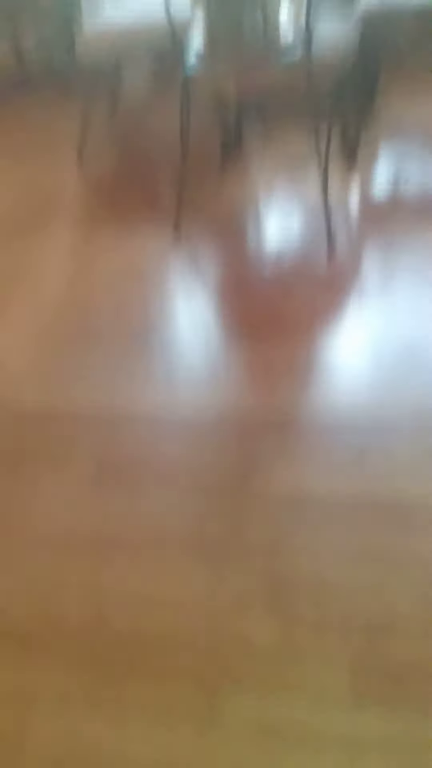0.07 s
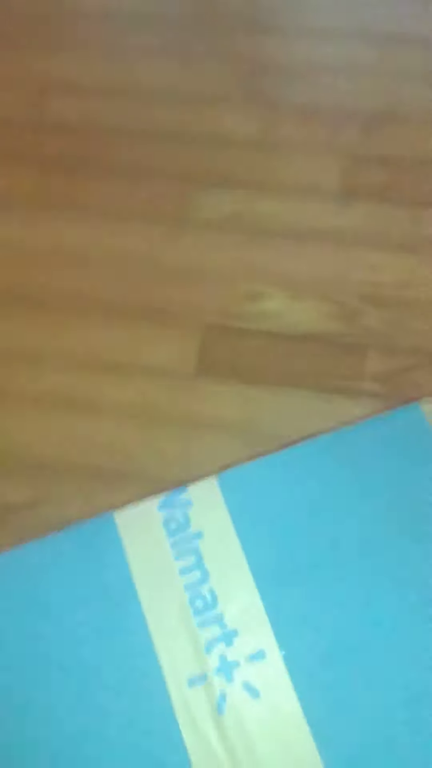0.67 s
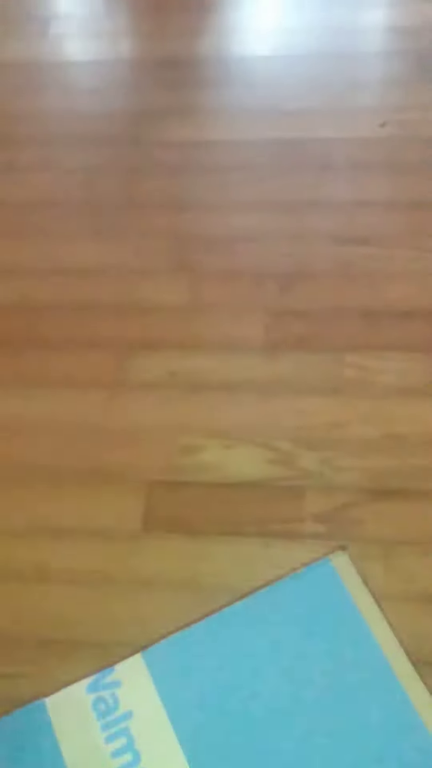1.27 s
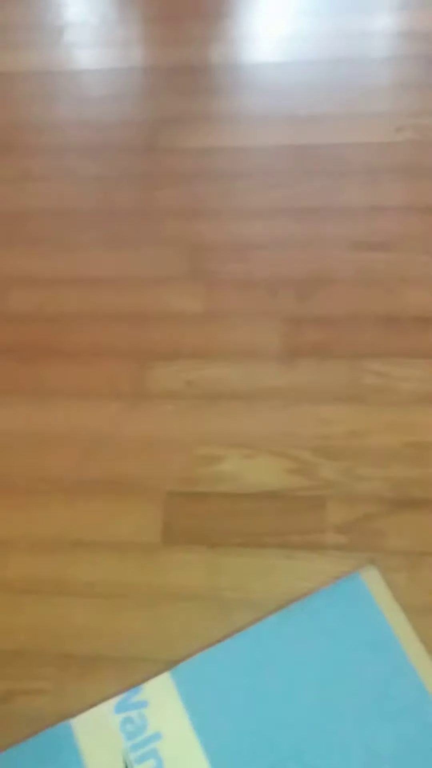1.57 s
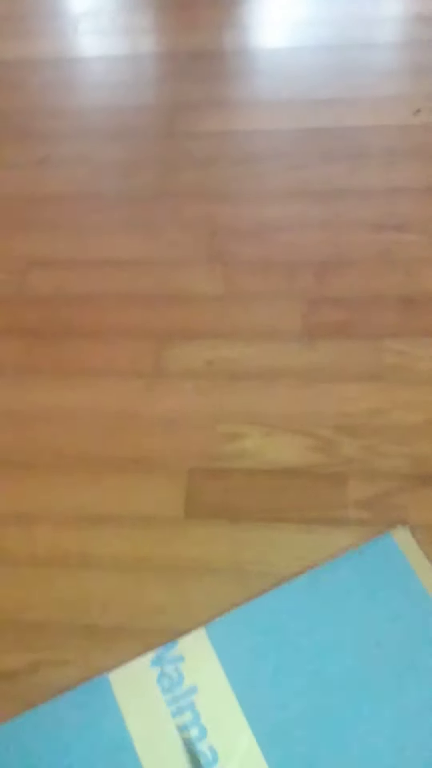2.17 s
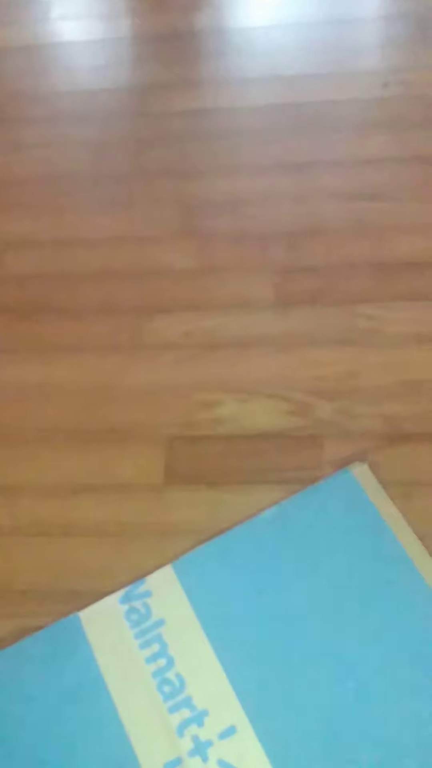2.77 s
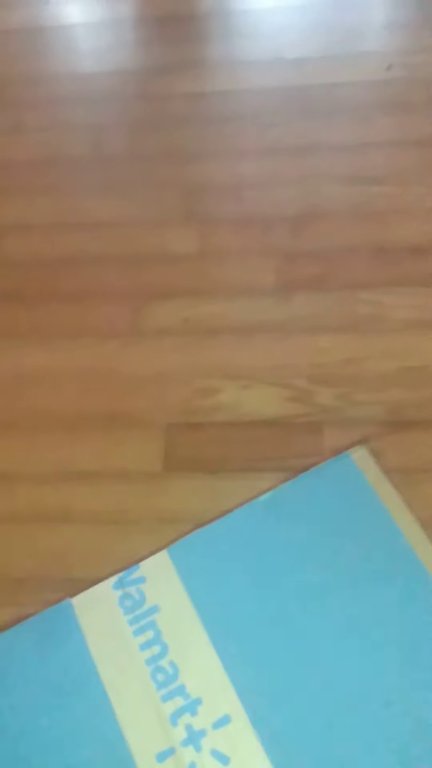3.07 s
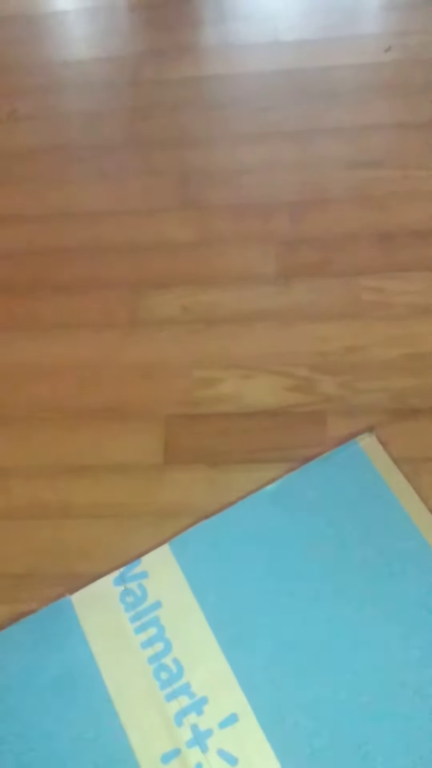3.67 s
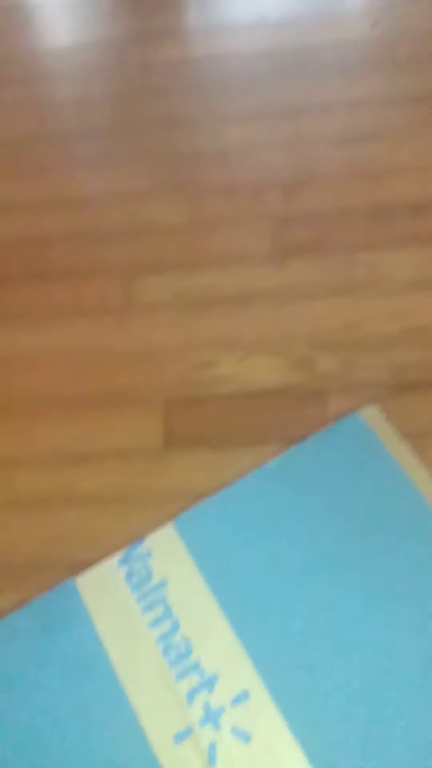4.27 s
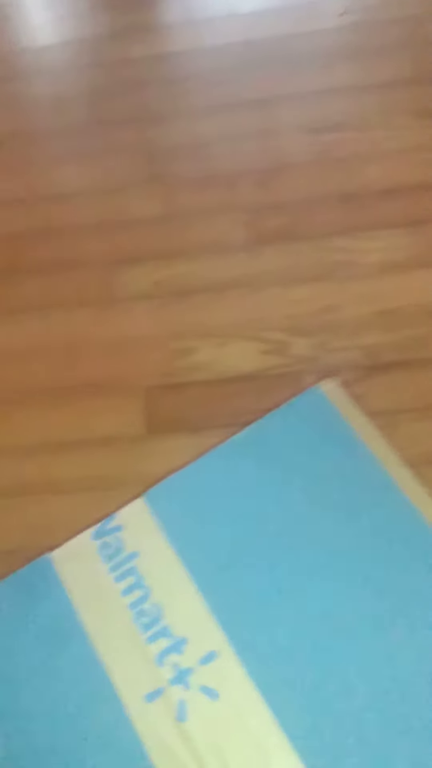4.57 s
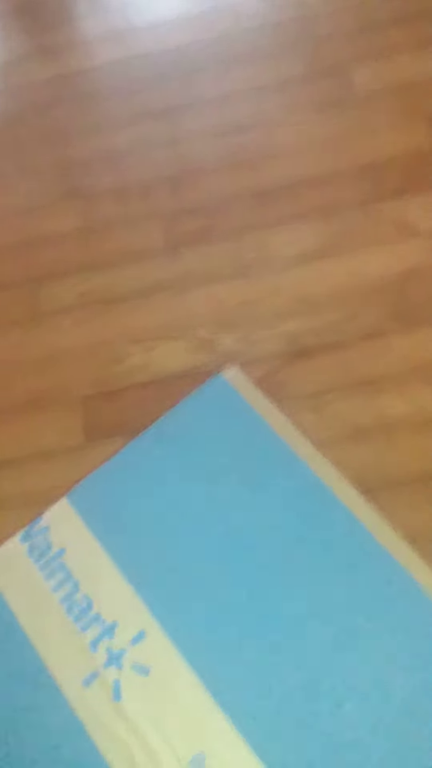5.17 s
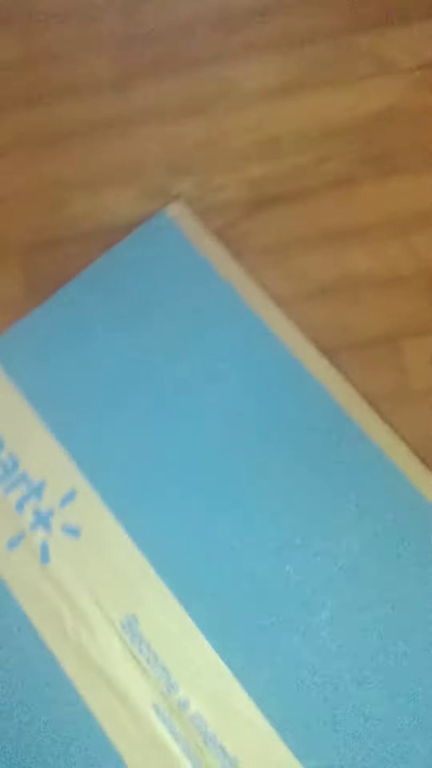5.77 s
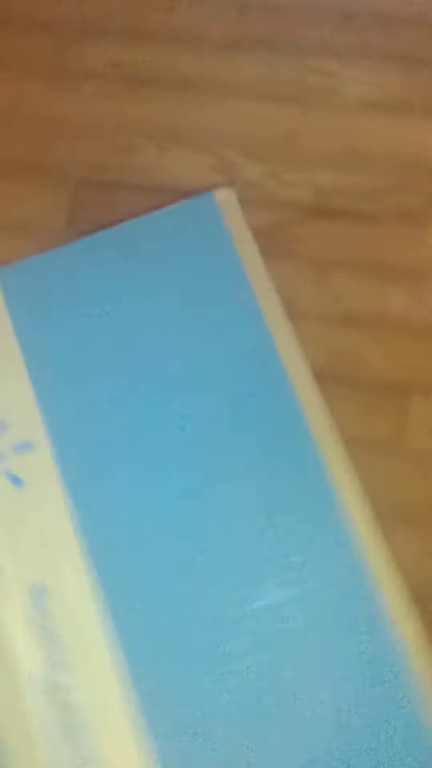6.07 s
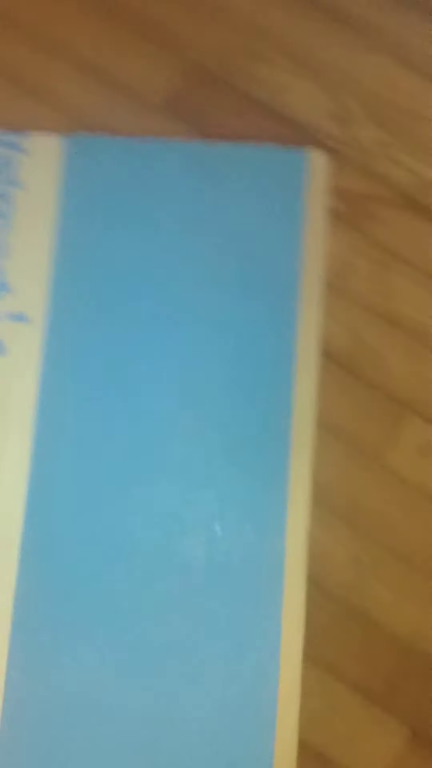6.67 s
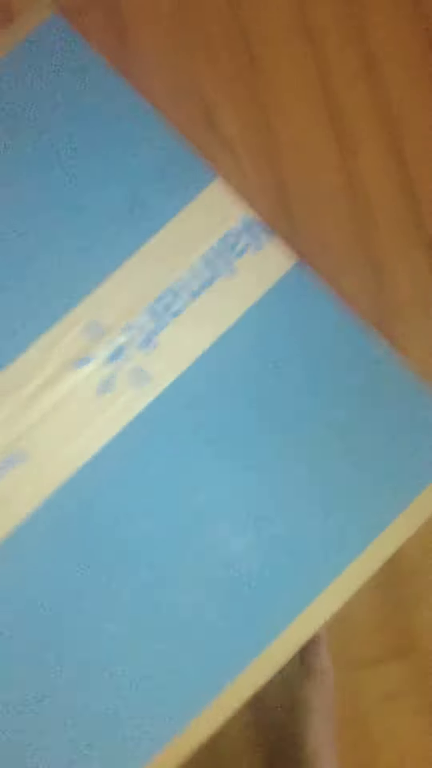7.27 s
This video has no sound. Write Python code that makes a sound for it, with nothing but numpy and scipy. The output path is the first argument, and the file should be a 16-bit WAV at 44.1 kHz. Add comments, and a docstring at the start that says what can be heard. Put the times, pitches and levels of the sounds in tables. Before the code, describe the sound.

In a room with a low, steady appliance hum, a blade lightly scratches a cardboard box close by. A juddering cut tears through the packing tape with hollow knocks and crackles. After a pause comes a second stroke that catches once, then sharp snaps and two short flicks. The rest is quiet handling, with soft brushes on the cardboard and a couple of dull bumps.

```python
"""A blade cuts the packing tape of a cardboard box, close to a stereo microphone in a wood-floored room.
It skims the seam, then makes two long strokes, the second catching once, and two short flicks.
Sticking and slipping, it drums the hollow box, tears fibres and rasps the tape; now and then it knocks
into the board or the tape snaps. Afterwards the box is quietly turned.
In the background a household appliance hums throughout."""
import sys
import numpy as np
from scipy import signal
from scipy.fft import rfft, irfft
from scipy.io import wavfile
from scipy.ndimage import uniform_filter1d, map_coordinates

SR = 44100
rng = np.random.default_rng(int(sys.argv[2]) if len(sys.argv) > 2 else 0)


def pcm_store(signal):
    """Save signal as 16-bit PCM."""
    levels = np.round(np.clip(np.atleast_2d(signal), -1, 1) * 32767)
    wavfile.write(sys.argv[1], SR, levels.astype(np.int16).T)


N = 331191
TIME = np.arange(N) / SR

# Event levels are relative: each source's function adds its own trim.
# strokes of the blade (up to speed at [s], length [s], rise [s], fall [s],
# hardest press [share of length], drumming [dB], fibres [dB], tape [dB])
STROKES = [(0.914, .12, 0.0057, 0.027, .25, -45, -50, -50.5),
           (1.104, 0.045, .012, 0.0095, .5, -43.5, -55, -50),
           (2.211, .49, 0.034, 0.047, 0.54, -23.5, -33, -39),
           (3.99, 0.079, 0.0045, 0.0025, 1, -31, -40.5, -46.5),
           (4.132, 0.18, 0.025, 0.0094, 0.034, -21, -39.5, -41.5),
           (4.465, 0.033, 0.003, 0.0021, 0.67, -38.5, -42, -38.5),
           (4.533, 0.043, 0.005, 0.0086, .3, -28.5, -47, -49)]
# the blade knocks into the board (time [s], level [dB], pitch of the kick [Hz])
KNOCKS = [(0.8702, -26, 260), (0.889, -36.5, 150), (1.045, -37.5, 407), (1.976, -35.5, 180),
          (2.363, -21, 202), (2.413, -14, 193), (2.464, -24, 195), (2.531, -19, 170), (2.584, -13.5, 132),
          (2.598, -20, 377), (3.905, -35, 384), (3.917, -33, 120), (3.99, -32, 400), (4.0782, -12, 410),
          (4.089, -20.5, 239), (4.137, -16.5, 188), (4.192, -22, 160), (4.312, -23.5, 248),
          (4.541, -23.5, 196)]
# tape or paper snaps (time [s], level [dB], brightness from papery - to hissing + [dB], rip time [s])
SNAPS = [(2.178, -45.5, -9.5, 0.0014), (2.2095, -32, -12.5, 0.00076), (2.2616, -29, 4.5, 0.00041),
         (2.452, -28, -1.5, 0.00206), (2.58, -33, -8, .0028), (3.915, -48.5, -3, 0.0027),
         (3.988, -42, -4, 0.0029), (4.0753, -34, -5, 0.00087), (4.125, -38, -9, 0.0012),
         (4.306, -25.5, -1.5, 0.0022), (4.31, -39, -1, 0.00252), (4.5323, -36, 11, 0.0015),
         (4.5376, -26.5, -2.5, 0.0029), (6.2575, -61, -3, .0006), (6.675, -60, -3, .0006),
         (6.7927, -55.5, -8.5, 0.00051), (7.39, -61, 0, 0.00091)]
# where the blade bears (time [s], position [0 rim to 1 lid])
BLADE_PLACE = [(1.2, .8), (1.9, 0), (3, 0), (3.9, 1)]
# the blade passes the microphone from left to right (start [s], end [s])
PASSES = [(.87, 1.1), (2.2, 3.4), (4.0, 4.23)]
# light rubbing (time [s], length [s], rise and fall [s], paper [dB], tape [dB])
RUBS = [(0, 0.17, 0.06, -55.5, -63.5), (6.214, 0.073, 0.15, -56.5, -62), (6.574, 0.076, 0.019, -71, -66),
        (6.796, 0.056, 0.024, -55.5, -74), (7.0, 0.17, 0.12, -74, -69), (7.387, .03, 0.039, -55.5, -67)]
# soft bumps of the box (time [s], level [dB])
BUMPS = [(5.46, -40), (7.373, -30)]
# modes of the box (frequency [Hz], width [Hz], blade at the rim [dB], blade on the lid [dB])
BOX_MODES = [(84, 30, -7, -14), (123, 16, 2, -1), (159, 16, -19, 1), (175, 16, 4, -14), (252, 18, -18, 4),
             (291, 18, -20, 2), (318, 30, -10, -13), (380, 30, -14, -6), (447, 30, -14, -5),
             (512, 45, -9, -14), (575, 50, -22, -14), (680, 70, -21, -28), (830, 90, -15, -30),
             (1020, 120, -16, -27)]
# spectra of board, tearing fibres, tape, cracking paper, scuffed paper and air (frequency [Hz], level [dB])
BOARD = [(25, -54), (55, -3.5), (90, -3.5), (300, -4), (1100, 1.5), (1500, 2), (2500, -7), (6000, -47)]
FIBRES = [(200, -24), (800, -10.5), (1400, -14), (1880, 4.5), (2130, -2), (2330, -0.5), (2700, -6),
          (3600, -8.5), (5600, -12.5), (7200, -17), (16000, -37)]
TAPE = [(500, -44), (3000, -2.5), (6000, -1), (8000, -8), (10000, 3.5), (12000, -1.5), (15500, 1),
        (18000, -24)]
CRACK = [(150, -37), (600, -3), (1300, 2), (1800, 11), (2350, 7), (2900, 1), (3500, -6), (4300, -6),
         (6500, -12.5), (8000, -19.5), (16000, -32)]
SCUFF = [(80, -7), (200, 10), (330, 2.5), (500, -7), (700, -9), (950, -8), (1300, -1.5), (2000, 1),
         (2900, -9.5), (4500, -18.5), (7000, -32), (16000, -38)]
AIR = [(20, -26), (40, -10), (60, 0.5), (110, 0), (180, -7.5), (240, -4.5), (330, -11), (700, -16),
       (1400, -21.5), (2300, -24.5), (3000, -30.5), (4300, -33), (8000, -42.5), (12000, -39.5),
       (16000, -40)]
# shading of the direct sound at the far, left microphone port (frequency [Hz], gain [dB])
LEFT_SHADE = [(100, -1), (600, 0), (2000, -16), (5000, -8), (12000, -2)]
# diffuse sound at the two ports (frequency [Hz], left-right likeness [0 to 1])
COHERENCE = [(25, 0.6), (60, 0.62), (180, 0.97), (350, 0.67), (700, 0.14), (1500, 0), (16000, 0)]
# decay of the room (frequency [Hz], time to fall 60 dB [s])
ROOM_T60 = [(100, 0.44), (400, 0.87), (2000, 0.67), (5000, 0.66), (10000, 0.43), (16000, 0.32)]
# reverberation at the microphone (frequency [Hz], level over the direct sound [dB])
ROOM_WET = [(100, -8), (300, -5.5), (800, -1), (2000, -3.5), (6000, -4), (16000, 1)]
# motor and mains lines of the appliance (frequency [Hz], rms level [dB])
HUM = [(73.2, -50.5), (92, -64), (120, -49), (269.5, -67), (293, -68.5), (360.5, -67.5), (436, -66),
       (597.5, -74.5)]


def cutting(fibre_db=-3, tape_db=-3, judder_db=2, slip_s=0.0018, slip_share=0.73, slip_click=0.53):
    """Each slip of the blade kicks the box, clicks, and lets go a cluster of breaks in fibre and tape."""
    slips = grains(per_s=380, spread_db=3)
    release = steadied(through(abs(slips), np.exp(-TIME[:2000] / slip_s)))
    bite = (1 - slip_share + slip_share * release) * amp(judder_db * drift(per_s=75))
    breaks = unit(bite * grains(per_s=3500, spread_db=4.5)) + slip_click * unit(slips)
    rasp = bite * grains(per_s=4800, spread_db=1)
    drum_gain, fibre_gain, tape_gain = stroke_gains()
    drum = steadied(drummed_box(slips)) * drum_gain
    fibres = steadied(through(breaks, colour(FIBRES))) * fibre_gain
    tape = steadied(through(rasp, colour(TAPE))) * tape_gain
    return drum + amp(fibre_db) * fibres + amp(tape_db) * tape


def stroke_gains(ease_db_per_s=43, fibre_share=0.2, quicken_db=2.5):
    """Drumming and, less so, tearing follow the hand's pressure; the rasp grows as the blade speeds up."""
    drum, fibres, tape = np.zeros((3, N))
    for s, length_s, rise_s, fall_s, hardest, drum_db, fibre_db, tape_db in STROKES:
        moving = envelope(s, length_s, rise_s, fall_s)
        along = np.clip((TIME - s) / length_s, 0, 1)
        press_db = -ease_db_per_s * length_s * abs(along - hardest)
        drum += moving * amp(drum_db + press_db)
        fibres += moving * amp(fibre_db + fibre_share * press_db)
        tape += moving * amp(tape_db + quicken_db * (along - .5))
    return drum, fibres, tape


def drummed_box(force):
    """A running force drums the box, whose tone shifts as the blade moves between rim and lid."""
    lid = blade_place(TIME)
    return through(force * (1 - lid), box_ring(0)) + through(force * lid, box_ring(0.8))


def box_ring(lid):
    """The box rings with a mix of modes set by where the blade bears, from rim (0) to lid (1)."""
    def gain_at(hz):
        power = sum(amp(rim_db + lid * (lid_db - rim_db)) ** 2 / (1 + (2 * (hz - f) / width) ** 2)
                    for f, width, rim_db, lid_db in BOX_MODES)
        return amp(read(BOARD, hz)) * np.sqrt(power)
    return ring(gain_at)


def blade_place(s):
    """Where the blade bears at time s."""
    return np.interp(s, *np.transpose(BLADE_PLACE))


def knocks(crack_db=-34.5, tick_db=-46, crush_share=0.4):
    """The blade hits the board; crushing grows more slowly than the blow, so heavy knocks are duller."""
    return sum(snag(s, db, crush_share * db + crack_db, crush_share * db + tick_db, hz, rip_s=.0008)
               for s, db, hz in KNOCKS)


def snaps(recoil_db=3.5, recoil_hz=520):
    """Tape or paper gives way, and the recoil kicks the box."""
    return sum(snag(s, db + recoil_db, db - bright_db, db + bright_db, recoil_hz, rip_s)
               for s, db, bright_db, rip_s in SNAPS)


def snag(s, thump_db, crack_db, tick_db, hz, rip_s, boost_db=3, cycles=0.69, punch=0.71, contact_s=0.00026):
    """One brief kick on the box, with a rip of paper and tape that swells and dies."""
    out, t = np.zeros(N), TIME[:1500]
    kick = np.sin(2 * np.pi * hz * t) * np.exp(-t * hz / cycles)
    paper_rip, tape_rip = rng.standard_normal((2, len(t))) * t * np.exp(-t / rip_s)
    thud = struck(through(kick, box_ring(blade_place(s))))
    jolt = through(np.diff(kick, prepend=0), np.exp(-t / contact_s))  # the lid jumps before the box rings
    add(thud, 0, punch * struck(jolt))
    add(out, s, amp(thump_db + boost_db) * struck(thud))
    add(out, s - rip_s / 2, amp(crack_db) * struck(through(paper_rip, colour(CRACK))))
    add(out, s - rip_s / 2, amp(tick_db) * struck(through(tape_rip, colour(TAPE))))
    return out


def skid(s=0.92, level_db=-40.5, ribs_hz=900, width_hz=650):
    """The point rattles over the ribs of the lid without cutting in."""
    panel = ring(lambda hz: 1 / (1 + (2 * (hz - ribs_hz) / width_hz) ** 2))
    rattle = steadied(through(grains(per_s=700, spread_db=4), panel))
    return amp(level_db) * rattle * envelope(s, 0, rise_s=0.022, fall_s=0.016)


def squeak(s=1.147, level_db=-46.5, hz=2325, sag_hz_per_s=3500, jitter=0.077):
    """Fast, uneven stick and slip of steel on tape, sagging as the blade slows."""
    pitch = (hz - sag_hz_per_s * (TIME - s)) * (1 + jitter * drift(per_s=730))
    gain = envelope(s, 0, rise_s=.022, fall_s=.022) * amp(level_db + 3 * drift(per_s=160))
    return gain * np.sin(2 * np.pi * np.cumsum(pitch) / SR)


def handling(trim_db=-4, bump_hz=58, bump_s=0.014):
    """Fingers and the flat of the blade brush paper and tape, and the box bumps softly."""
    paper = steadied(through(grains(per_s=2000, spread_db=0), colour(SCUFF)))
    tape = steadied(through(grains(per_s=2700, spread_db=5), colour(TAPE)))
    out = sum(envelope(s, length_s, swell_s, swell_s) * (amp(paper_db) * paper + amp(tape_db) * tape)
              for s, length_s, swell_s, paper_db, tape_db in RUBS)
    t = TIME[:8000]
    bump = t / bump_s * np.exp(1 - t / bump_s) * np.sin(2 * np.pi * bump_hz * t)
    for s, db in BUMPS:
        add(out, s, amp(db) * bump)
    return amp(trim_db) * out


def room(direct, spilled, port_delay_s=0.000253, shift_per_s=4, tails=4):
    """The direct sound reaches the left port late and shaded; the reflections keep shifting."""
    late = map_coordinates(direct, [(TIME - port_delay_s) * SR], order=3)
    left = irfft(rfft(late) * amp(read(LEFT_SHADE, np.fft.rfftfreq(N, 1 / SR))), N)
    out = np.array([left, direct])
    for k in range(tails):
        share = np.maximum(np.cos(2 * np.pi * (shift_per_s * TIME - k / tails)), 0)  # squares sum to 1
        out += [through(spilled * share, tail) for tail in room_tail()]
    return out


def travel(pair, start_db=3.5, end_db=-0.8, above_hz=1000):
    """The treble moves from left to right as the blade runs along the seam past the microphone."""
    left_over_right_db = np.interp(TIME, np.ravel(PASSES), [start_db, end_db] * len(PASSES))
    gains = amp(np.array([left_over_right_db, -left_over_right_db]) / 2)
    treble = signal.lfilter(*signal.butter(1, above_hz, "high", fs=SR), pair)
    return pair + treble * (gains - 1)


def room_tail(early_db=1, early_s=0.017, taps_per_s=8000, gap_s=.003, size=32768):
    """Dense reflections of random sign, each band dying at its own speed: one response a port."""
    t = TIME[:size]
    taps = rng.choice([-1., 1.], (2, size)) * (rng.random((2, size)) < taps_per_s / SR) * (t > gap_s)
    taps *= 1 + amp(early_db) * np.exp(-t / early_s)
    hz, when, bands = signal.stft(taps, SR, nperseg=256)
    decay = amp(-60 * when / read(ROOM_T60, hz)[:, None])
    tail = signal.istft(bands * decay, SR, nperseg=256)[1][:, :size]
    return diffuse(tail / np.linalg.norm(tail, axis=1, keepdims=True), ROOM_WET)


def appliance(air_db=-51.5, waver_db=0.95):
    """In the background, motor and mains lines waver slightly over a soft rush of air."""
    air = unit(diffuse(rng.standard_normal((2, N)), AIR)) * amp(air_db + 0.083 * drift(per_s=14))
    hum = np.zeros(N)
    for hz, db in HUM:
        peak = np.sqrt(2) * amp(db + waver_db * drift(per_s=9.5))
        hum += peak * np.sin(2 * np.pi * (hz * TIME + rng.random()) + 0.075 * drift(per_s=2.01))
    return air + hum


def diffuse(pair, spectrum):
    """Colours two unrelated signals and makes them alike in the bass, as at two close ports."""
    size = pair.shape[1]
    hz, (a, b) = np.fft.rfftfreq(size, 1 / SR), rfft(pair)
    same = read(COHERENCE, hz)
    mid, side = a * np.sqrt((1 + same) / 2), b * np.sqrt((1 - same) / 2)
    return irfft(np.array([mid + side, mid - side]) * amp(read(spectrum, hz)), size)


def grains(per_s, spread_db):
    """A random train of tiny breaks; with a wide spread, a few are much larger than the rest."""
    size = amp(spread_db * np.minimum(rng.exponential(1, N), 4)) * rng.choice([-1, 1], N)
    return size * (rng.random(N) < per_s / SR)


def envelope(s, length_s, rise_s, fall_s):
    """Swells up to time s, holds at 1, and dies away."""
    early, late = np.maximum(s - TIME, 0), np.maximum(TIME - s - length_s, 0)
    return np.exp(-np.minimum(early / rise_s + late / fall_s, 20))


def drift(per_s):
    """A random wander of rms 1."""
    knots = np.arange(0, TIME[-1] + 1, 1 / per_s)
    return unit(np.interp(TIME, knots, rng.standard_normal(len(knots))))


def steadied(x, size=1500):
    """Holds the short-time power at 1, so that the hand alone sets the level."""
    power = uniform_filter1d(uniform_filter1d(x ** 2, size), size // 2)
    return x / np.sqrt(abs(power) + 1e-3 * np.mean(x ** 2))


def struck(sound):
    """Scales a hit to the energy of 5 ms at level 1."""
    return sound * np.sqrt(220 / np.sum(sound ** 2))


def ring(gain_at, size=8192):
    """Causal impulse response of energy 1 with the given gain over frequency."""
    log_gain = np.log(gain_at(abs(np.fft.fftfreq(size, 1 / SR))) + 1e-6)
    response = np.fft.ifft(np.exp(np.conj(signal.hilbert(log_gain)))).real[:size // 2]
    return response / np.linalg.norm(response)


def colour(spectrum):
    """Impulse response with the given spectrum."""
    return ring(lambda hz: amp(read(spectrum, hz)))


def through(x, response):
    """Filters x by an impulse response."""
    return signal.oaconvolve(x, response)[:N]


def read(points, hz):
    """Reads a table on a log-frequency axis."""
    f, value = np.transpose(points)
    return np.interp(np.log(hz + 1), np.log(f + 1), value)


def add(mix, s, sound):
    """Mixes a sound in at time s."""
    part = mix[max(round(s * SR), 0):][:len(sound)]
    part += sound[:len(part)]


def amp(db):
    """Decibels to gain."""
    return 10 ** (np.asarray(db) / 20)


def unit(x):
    """Scales to rms 1."""
    return x / np.sqrt(np.mean(x ** 2) + 1e-20)


def scene(snag_room_db=-3):
    """Blade and box near the microphone, the humming room behind."""
    sliding = cutting() + skid() + squeak() + handling()
    sudden = knocks() + snaps()
    spilled = sliding + amp(snag_room_db) * sudden  # snags face the microphone and stir the room less
    return travel(room(sliding + sudden, spilled)) + appliance()


def record(dry):
    """The recorder's band limit."""
    lowpass = signal.firwin(511, cutoff=15950, window=("kaiser", 9), fs=SR)
    return signal.oaconvolve(dry, lowpass[None], "same")


dry = scene()
out = record(dry)
pcm_store(out)
```